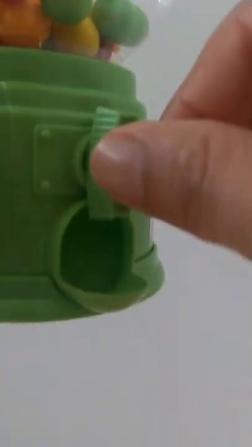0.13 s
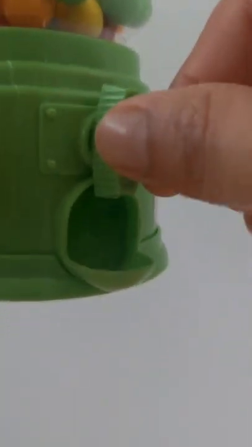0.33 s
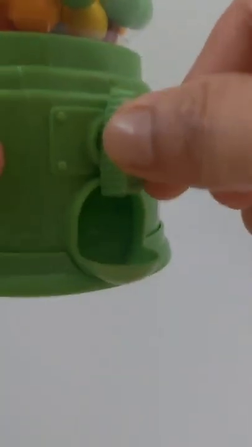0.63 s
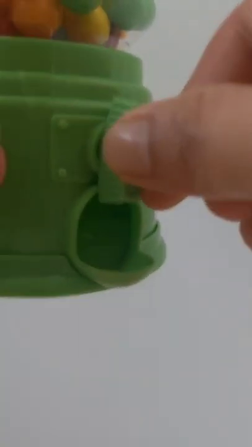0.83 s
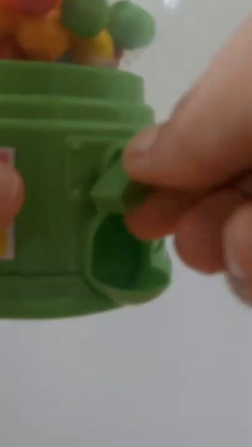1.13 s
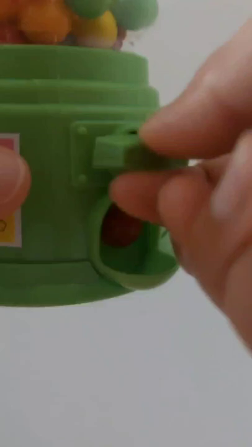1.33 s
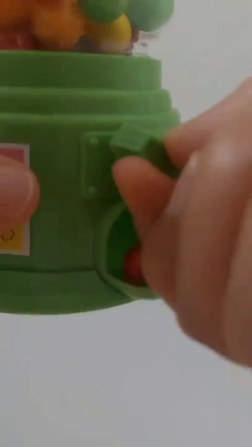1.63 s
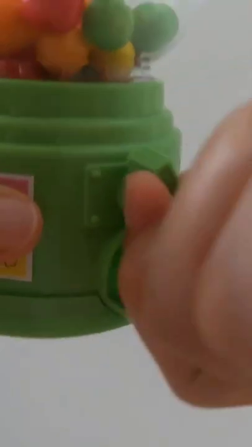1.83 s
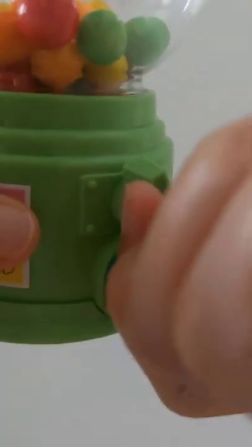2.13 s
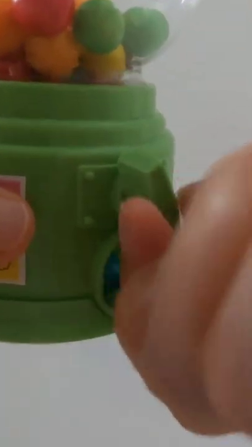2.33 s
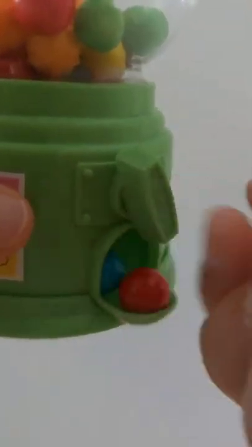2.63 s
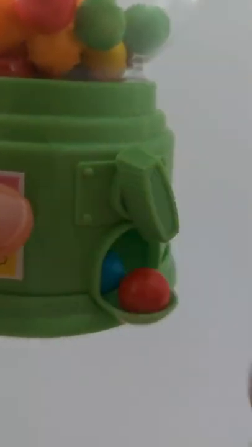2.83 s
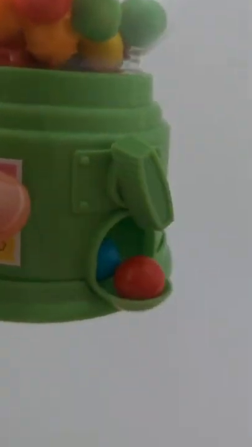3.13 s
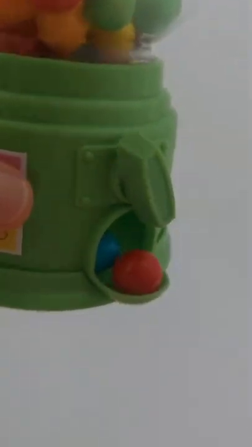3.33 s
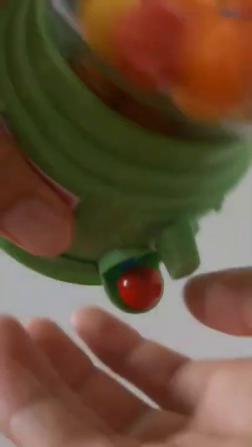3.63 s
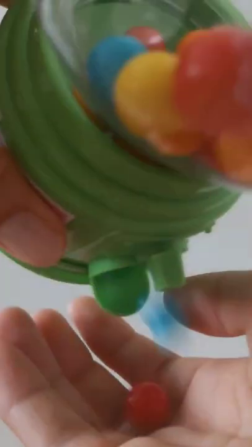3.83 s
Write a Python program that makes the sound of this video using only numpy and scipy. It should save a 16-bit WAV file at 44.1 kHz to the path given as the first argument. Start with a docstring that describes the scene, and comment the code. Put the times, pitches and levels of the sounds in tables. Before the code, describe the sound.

A toy gumball machine, close in a quiet small room with low rumble, faint hiss and hum. A barely audible rub comes near 0.7 s. From 1.1 to 1.95 s plastic scrapes and hollow knocks surround four bright crank snaps with low thumps; another knock cluster follows at 2.06-2.36 s. Faint finger squeaks near 2.5 s, then quiet until 3.7-4.0 s, when gumballs rattle densely against the clear dome.

```python
"""A quiet room, close to a small plastic gumball machine whose crank a hand turns.
The crank snaps four times (filtered noise cracks) and jolts the housing (falling low thumps) while
gumballs knock down the chute into the tray (cracks with a hollow note and ringing plastic modes).
Then the machine is tilted and the gumballs tumble against its clear dome (strikes among many small
collisions). Rubbing, squeaks, room reflections, low rumble, hiss and hum lie around them."""
import sys
import numpy as np
from scipy import signal
from scipy.fft import rfft, irfft
from scipy.io import wavfile

SR = 44100
rng = np.random.default_rng(int(sys.argv[2]) if len(sys.argv) > 2 else 0)


def store_wav(level_fs):
    """Save 16-bit WAV to argv[1]."""
    pcm = np.round(np.clip(np.atleast_2d(level_fs), -1, 1) * 32767)
    wavfile.write(sys.argv[1], SR, pcm.T.astype(np.int16))


N = 176400  # samples: 4 s

# Crank snaps: t/s, body level/dB, middle level/dB, treble level/dB, jolt level/dB,
# jolt left minus right level/dB
SNAPS = [(1.3418, -33, -30, -16, -15, -27.5), (1.4922, -34, -24.5, -15.5, -27.5, -20),
         (1.7093, -34, -27.5, -16, -18.5, 22.5), (1.944, -30.5, -26, -17.5, -18.5, 16)]
# Resonant modes of the housing: f/Hz, level/dB, t60/s
HOUSING_MODES = [(835, -1.5, 0.046), (920, -9.5, 0.064), (1095, -4.5, 0.02), (1480, -2.5, 0.03),
                 (1938, -2.5, 0.11), (2130, -12, .06), (3430, -4, 0.051), (4254, -4, 0.05), (5460, -6, .04),
                 (6200, -11, .03), (6650, -13.5, .025)]
LIKENESS = 0.3  # correlation of the left and right noise in blows and friction


def amp(db):
    """Level to amplitude: 20 dB is a factor of ten."""
    return 10 ** (np.asarray(db) / 20)


def unit(x):
    """Energy normalization: the squares along the last axis sum to 1."""
    return x / np.sqrt((x ** 2).sum(-1, keepdims=True) + 1e-20)


def read(points, hz):
    """Logarithmic frequency scale: a table is interpolated over equal ratios of frequency."""
    f, value = np.transpose(points)
    return np.interp(np.log(hz + 1), np.log(f + 1), value)


def add(mix, s, sound):
    """Superposition: a stereo sound is summed into the mix from time s."""
    part = mix[:, max(round(s * SR), 0):][:, :sound.shape[1]]
    part += sound[:, :part.shape[1]]


def noise(count, likeness):
    """Partial coherence: two white noises that share a common part."""
    a, b = rng.standard_normal((2, count))
    c = np.clip(likeness, -1, 1)
    return np.array([a, c * a + np.sqrt(1 - c * c) * b])


def colour(x, *tables, size=2048):
    """Minimum-phase filtering: the summed (f/Hz, level/dB) tables fix the phase by a Hilbert transform."""
    hz = abs(np.fft.fftfreq(size, 1 / SR))
    log_gain = np.log(amp(sum(read(table, hz) for table in tables)))
    response = np.exp(np.conj(signal.hilbert(log_gain)))
    taps = np.fft.ifft(response).real[None, :size // 2]
    return signal.fftconvolve(x, taps, axes=1)[:, :x.shape[1]]


def blow(levels, tone, modes, tick_db, crack_t60, shiver_db, shiver_t60, modes_db, size=6000):
    """Impact excitation: a tick, a crack, a dense short shiver and longer damped modes (t60 in s)."""
    # How unevenly a struck spot favours its own pitches: f/Hz, spread of level/dB
    spot_ripple = [(900, 3), (2500, 2.5), (6000, 2), (14000, 1.5)]
    attack_s, mode_spread_db = 0.0004, 1.5
    body_hz, middle_hz, treble_hz = 1350, 2960, 6536
    t = np.arange(size) / SR

    crack_fade = unit(amp(-60 * t / crack_t60))
    shiver_fade = amp(shiver_db) * unit(amp(-60 * t / shiver_t60))
    fade = np.hypot(crack_fade, shiver_fade)
    crack = unit(noise(size, LIKENESS) * fade * (1 - np.exp(-t / attack_s)))
    tick = amp(tick_db) * signal.unit_impulse(size, round(2 * attack_s * SR))
    crack = unit(crack + tick)

    hz, db, t60 = np.transpose(modes)
    decay = unit(amp(-60 * t / np.minimum(t60, 0.13)[:, None]))  # no mode outlasts a t60 of 0.13 s
    rings = np.exp(2j * np.pi * hz[:, None] * t) * decay
    strength = amp(modes_db + db + mode_spread_db * rng.standard_normal(len(hz)))
    # each mode has a random phase, slightly different on the two sides
    phase = 2 * np.pi * rng.random(len(hz)) + 0.5 * rng.standard_normal((2, len(hz)))
    ring = ((strength * np.exp(1j * phase)) @ rings).real

    spot_hz = np.geomspace(900, 15000, 60)
    spot_db = read(spot_ripple, spot_hz) * rng.standard_normal(len(spot_hz))
    spot = np.transpose([spot_hz, spot_db])
    tilt = list(zip((body_hz, middle_hz, treble_hz), levels))
    return colour(crack + ring, tone, spot, tilt)


def crank():
    """Impulsive radiation: each snap of the crank is a short bright crack."""
    # Spectral envelope of a snap: f/Hz, level/dB
    snap_tone = [(100, 27), (300, 35), (680, 31.5), (900, 43), (1100, 32), (1300, 40), (1500, 34),
                 (1700, 34.5), (1960, 44), (2400, 36), (4200, 30.5), (5000, 27), (6500, 32.5), (8500, 24),
                 (11000, 23), (14000, 26)]
    out = np.zeros((2, N))
    for s, *levels, _, _ in SNAPS:
        snap = blow(levels, snap_tone, HOUSING_MODES,
                    tick_db=-7, crack_t60=0.02, shiver_db=0, shiver_t60=0.026, modes_db=-20)
        add(out, s, snap)
    return out


def jolts():
    """Transient displacement: with each snap a hard shove, then a low thump of falling pitch, to one side."""
    start_hz, end_hz, sag_s, decay_s = 201.6, 50.15, 0.0041, 0.023
    shove_db, shove_delay_s, shove_width_s = -7, 0.0021, 0.000519
    out, t = np.zeros((2, N)), np.arange(SR // 8) / SR
    hz = end_hz + (start_hz - end_hz) * np.exp(-t / sag_s)
    swell = 1 - np.exp(-(t / shove_delay_s) ** 4)
    decay = np.exp(-(t / decay_s) ** 2)
    thump = -np.sin(2 * np.pi * np.cumsum(hz) / SR) * swell * decay
    shove = -amp(shove_db) * np.exp(-((t - shove_delay_s) / shove_width_s) ** 2)
    for s, *_, db, side_db in SNAPS:
        sides = unit(amp([side_db, 0]))[:, None]
        add(out, s, amp(db) * sides * (thump + shove))
    return out


def chute():
    """Cavity and wall resonance: each knock in wheel, chute or tray has its own hollow note and ring."""
    # Gumball knocks: t/s, body level/dB, middle level/dB, treble level/dB, hollow note f/Hz, wall ring f/Hz
    knock_table = [(1.1724, -16, -27.5, -17, 810, 1456), (1.2288, -21.5, -22, -23.5, 850, 2150),
                   (1.2535, -35, -31.5, -34, 950, 2050), (1.2597, -27.5, -22.5, -30.5, 930, 1970),
                   (1.2723, -26, -29, -37.5, 920, 1920), (1.2843, -26, -24.5, -30, 860, 2060),
                   (1.3031, -38.5, -35.5, -48, 850, 2030), (1.3764, -36, -58.5, -45.5, 860, 2020),
                   (1.455, -24, -31.5, -32, 830, 2930), (1.4606, -30, -36.5, -40, 950, 1960),
                   (1.5062, -23.5, -30, -25.5, 1020, 2560), (1.5256, -42, -37.5, -32, 940, 2780),
                   (1.5339, -44, -38, -36.5, 950, 2660), (1.5459, -39, -36.5, -37.5, 950, 1880),
                   (1.5537, -30, -41.5, -41, 900, 1870), (1.5963, -31.5, -29.5, -32.5, 1110, 3210),
                   (1.6194, -30, -28.5, -30, 1110, 3240), (1.6322, -39, -35.5, -47.5, 1100, 1840),
                   (1.6563, -30, -31, -30.5, 1100, 2090), (1.6735, -34.5, -35.5, -43, 1120, 2040),
                   (1.7762, -40, -44, -54, 860, 1940), (1.8238, -43.5, -37, -45.5, 1090, 2820),
                   (1.857, -41.5, -47, -61.5, 960, 2020), (1.9232, -47, -53.5, -71, 860, 1970),
                   (2.0638, -16.5, -23, -17.5, 1020, 3430), (2.1198, -25.5, -25.5, -32, 1510, 2020),
                   (2.1409, -31, -30, -29, 890, 1934), (2.1528, -35, -38, -55.5, 1390, 1990),
                   (2.1709, -24.5, -29.5, -25.5, 1380, 1906), (2.1845, -30.5, -30.5, -39, 1400, 1960),
                   (2.2049, -33, -33.5, -35.5, 1110, 4600), (2.211, -22, -24.5, -23, 1070, 4480),
                   (2.2396, -38.5, -37.5, -40, 1360, 1987), (2.3204, -37.5, -36, -38.5, 980, 4445),
                   (2.3555, -46, -47.5, -61, 1480, 1970)]
    # Spectral envelope of a knock: f/Hz, level/dB
    knock_tone = [(100, 15), (300, 28.4), (400, 17), (700, 24), (810, 34.5), (1100, 35.8), (1260, 31),
                  (1500, 34.5), (1740, 32), (2100, 36.4), (3000, 31.44), (5000, 32.2), (8000, 30.3),
                  (11000, 24), (14000, 19)]
    hollow_db, hollow_width = 3.5, 0.4  # width in natural log of frequency
    wall_db, wall_t60 = -1.5, 0.062  # t60 in s
    out = np.zeros((2, N))
    hz = np.geomspace(100, 15000, 120)
    for s, *levels, note_hz, ring_hz in knock_table:
        hollow = hollow_db * np.exp(-(2 * np.log(hz / note_hz) / hollow_width) ** 2)
        tone = np.transpose([hz, read(knock_tone, hz) + hollow])
        modes = [*HOUSING_MODES, (ring_hz, wall_db, wall_t60)]
        knock = blow(levels, tone, modes,
                     tick_db=-8, crack_t60=0.024, shiver_db=-11, shiver_t60=0.08, modes_db=-16)
        add(out, s, knock)
    return out


def dome():
    """Modal excitation by a granular flow: hard strikes on the dome among many small collisions."""
    # Strikes on the dome: t/s, body level/dB, middle level/dB, treble level/dB
    strikes = [(3.707, -37.5, -32, -72), (3.7168, -39, -25, -37), (3.7215, -35.5, -21, -27),
               (3.7264, -29.5, -16, -28), (3.732, -27, -19, -19.5), (3.7429, -32.5, -22, -34),
               (3.7529, -29, -19, -23.5), (3.764, -23, -18, -22.5), (3.768, -28.5, -19, -23),
               (3.7708, -20, -30, -19.5), (3.7809, -46, -14, -26), (3.7836, -30, -23, -22),
               (3.794, -31.5, -17, -23), (3.802, -28, -23, -25.5), (3.8056, -24, -19.5, -16.5),
               (3.8179, -33.5, -19.5, -24.5), (3.8301, -36, -32, -31), (3.846, -19.5, -29, -34),
               (3.8532, -28, -25, -27.5), (3.8682, -33.5, -28, -33), (3.8772, -28.5, -15, -30),
               (3.8892, -31.5, -28, -27), (3.893, -35, -19.5, -26.5), (3.9122, -24, -34, -27),
               (3.9178, -27, -16.5, -17.5), (3.9361, -28, -17.5, -16.5), (3.9655, -27, -26, -26.5),
               (3.9822, -29.5, -36, -37)]
    # Course of the small collisions in the heap: t/s, level/dB
    tumble = [(3.675, -71), (3.69, -56), (3.706, -52.5), (3.73, -34), (3.78, -28.5), (3.82, -29.5),
              (3.86, -33), (3.9, -36), (3.945, -30), (3.975, -43.5), (4.0, -55)]
    # Spectral envelope of a strike: f/Hz, level/dB
    strike_tone = [(100, 21.3), (280, 28.7), (400, 23.6), (680, 27.2), (850, 29.4), (1200, 30.7),
                   (1550, 37.9), (1750, 33), (2200, 37.5), (3000, 33), (4500, 32.5), (7000, 31.7),
                   (8500, 27.3), (9500, 21), (10200, 22.2), (12500, 21), (14500, 7.7)]
    # Resonant modes of the dome: f/Hz, level/dB, t60/s before the cap in blow()
    dome_modes = [(841, 4, 0.046), (1497, -8, 0.054), (1967, -1.5, 0.12), (2140, -3, 0.23),
                  (2331, -6.5, 0.095), (2450, -11, 0.077), (2490, -4, 0.2), (2650, -3.5, 0.14),
                  (2973, 2, 0.072), (3050, -4, 0.051), (3080, -12, 0.039), (3475, -1, 0.068),
                  (4330, -5.5, 0.096), (4580, 1.5, 0.066), (5206, 3, 0.027), (5630, -3, 0.049)]
    shape = dict(tick_db=-8, crack_t60=0.026, shiver_db=-6, shiver_t60=0.075, modes_db=-17)
    collisions_per_s, spread_db, body_db, treble_db = 220, 2, -2, -1.5
    out = np.zeros((2, N))
    for s, *levels in strikes:
        add(out, s, blow(levels, strike_tone, dome_modes, **shape))

    times, db = np.transpose(tumble)
    for slot in np.arange(times[0], times[-1], 1 / collisions_per_s):
        s = slot + rng.random() / collisions_per_s  # at random within its slot
        level = np.interp(s, times, db) + spread_db * rng.standard_normal()
        levels = (level + body_db, level, level + treble_db)
        add(out, s, blow(levels, strike_tone, dome_modes, **shape))
    return out


def rubs():
    """Sliding friction: grainy noise of fingers rubbing the plastic and of the wheel scraping as it turns."""
    # Rubs and scrapes: t/s, length/s, level/dB
    rub_table = [(0.694, 0.075, -71.5), (1.073, 0.044, -55), (1.115, 0.031, -59.5), (1.179, 0.63, -46.5),
                 (2.099, 0.17, -44.5), (2.476, 0.15, -74), (2.801, 0.013, -73.5)]
    # Spectral envelope of the friction: f/Hz, level/dB
    rub_tone = [(300, -9.5), (900, 10.5), (1600, 4.5), (2100, 6), (2700, 1), (6500, -4), (10000, -17),
                (14000, -18)]
    t = np.arange(N) / SR
    level = sum(amp(db) * np.sin(np.pi * np.clip((t - s) / length, 0, 1))
                for s, length, db in rub_table)
    grains = rng.exponential(1, N)
    return colour(noise(N, LIKENESS) * grains * level, rub_tone)


def squeaks():
    """Friction-driven resonance: a finger slipping off the crank sounds as a faint narrow band of noise."""
    # Squeaks: t/s, length/s, level/dB
    squeak_table = [(2.489, 0.052, -76), (2.587, .027, -72)]
    squeak_hz, width_hz = 1970, 220
    hz, t = np.fft.rfftfreq(N, 1 / SR), np.arange(N) / SR
    band = np.exp(-(2 * (hz - squeak_hz) / width_hz) ** 2)
    voice = unit(irfft(rfft(noise(N, LIKENESS)) * band, N)) * np.sqrt(N)
    level = 0
    for s, length, db in squeak_table:
        arch = np.sin(np.pi * np.clip((t - s) / length, 0, 1))
        level = level + amp(db) * np.sqrt(abs(arch))
    return voice * level


def room(x):
    """Reverberation: sparse reflections of a small room, each band decaying at its own rate."""
    # Reverberation time: f/Hz, t60/s
    reverb_t60 = [(200, 0.19), (800, .34), (2000, 0.21), (6000, 0.315), (14000, 0.15)]
    # Spectral envelope of the reflections: f/Hz, level/dB
    reverb_tone = [(100, -18), (400, -16), (1000, -17), (3000, -14.5), (7000, -19.5), (14000, -12)]
    onset_s, density = 0.0051, 0.12  # density: share of samples holding a reflection
    count = SR // 2
    taps = rng.standard_normal((2, count)) * (rng.random((2, count)) < density)
    hz, t, bands = signal.stft(taps, SR, nperseg=256)
    decay = amp(-60 * t / read(reverb_t60, hz)[:, None])
    tail = signal.istft(bands * decay, SR)[1][:, :count]
    onset = np.minimum(np.arange(count) / SR / onset_s, 1) ** 2
    tail = unit(tail * onset)
    return signal.fftconvolve(x, colour(tail, reverb_tone), axes=1)[:, :N]


def background():
    """Stationary noise and amplitude modulation: low room rumble, faint wide hiss and a wavering hum."""
    # Spectrum of the rumble and hiss, relative: f/Hz, level/dB per Hz
    air_spectrum = [(12, -66.5), (20, -35.5), (32, -27.5), (35, -10), (42, -13.5), (64, -3.5), (87, -6.5),
                    (111, -4.5), (128, -21), (160, -11.5), (310, -23.5), (398, -37.5), (753, -36),
                    (1510, -50), (15000, -60.5)]
    # Stereo width of the rumble and hiss: f/Hz, side minus mid level/dB
    air_side = [(60, -23), (150, -13.5), (380, -6), (950, 1), (2380, 0.5), (5980, 0.5), (15000, 2.5)]
    # Hum partials: f/Hz, level/dB (rms)
    hum_partials = [(61.2, -53), (305, -74)]
    # Course of the whole background: t/s, relative level/dB
    course = [(0, 0.5), (1.06, 2), (1.1, -3), (1.171, -1), (1.4, 1.5), (2.5, -3), (3.1, -4), (3.6, 1)]
    air_db, hum_lag_s, hum_waver, hum_likeness = -56.5, 0.0008, 0.2, 0.6
    hz, t = np.fft.rfftfreq(N, 1 / SR), np.arange(N) / SR
    mid, side = rfft(rng.standard_normal((2, N))) * amp(read(air_spectrum, hz))
    side = side * amp(read(air_side, hz))
    air = unit(irfft(np.array([mid + side, mid - side]), N)) * np.sqrt(N)

    slow = np.exp(-hz / 3)  # keeps only fluctuations of a few Hz
    waver = unit(irfft(rfft(noise(N, hum_likeness)) * slow, N)) * np.sqrt(N)
    ear_t = t - np.array([[0], [hum_lag_s]])  # the hum comes later on the right
    hum = sum(amp(db) * np.sqrt(2) * np.sin(2 * np.pi * (f * ear_t + rng.random()))
              for f, db in hum_partials)
    level = amp(np.interp(t, *np.transpose(course)))
    return (amp(air_db) * air + hum * (1 + hum_waver * waver)) * level


def scene():
    """Interaural level and phase differences place the machine and its reverberation between the ears."""
    # Stereo balance: f/Hz, left minus right level/dB
    balance = [(300, -3), (800, 3.5), (1500, 5.5), (3000, 1), (6500, 2), (9000, 0.5), (13000, -1.5)]
    # Phase by which the right side trails: f/Hz, phase/rad
    right_lag = [(200, 0.1), (500, 1.1), (1000, 1.4), (2000, 1.9), (4000, 1.6), (8000, 1.6), (14000, 1.3)]
    snap_wet_db = 6.5  # snaps radiate from outside the housing and reach the room more
    snaps, knocks, tumble = crank(), chute() + rubs() + squeaks(), dome()
    direct = snaps + knocks + tumble
    reflected = amp(snap_wet_db) * room(snaps) + room(knocks) + room(tumble)
    hz = np.fft.rfftfreq(N + SR, 1 / SR)
    lean_db = read(balance, hz) / 2
    ears = np.array([amp(lean_db), amp(-lean_db) * np.exp(-1j * read(right_lag, hz))])
    toy = irfft(rfft(direct + reflected, N + SR) * ears)[:, :N]
    return toy + jolts() + background()


def record(dry):
    """Soft saturation and band limiting: the highest peaks are rounded, then a low-pass filter follows."""
    ceiling, edge_hz = 0.95, 14650
    rounded = dry / (1 + (dry / ceiling) ** 8) ** (1 / 8)
    low_pass = signal.firwin(255, edge_hz, window=("kaiser", 8), fs=SR)
    return signal.oaconvolve(rounded, low_pass[None], "same")


dry = scene()
out = record(dry)
store_wav(out)
```